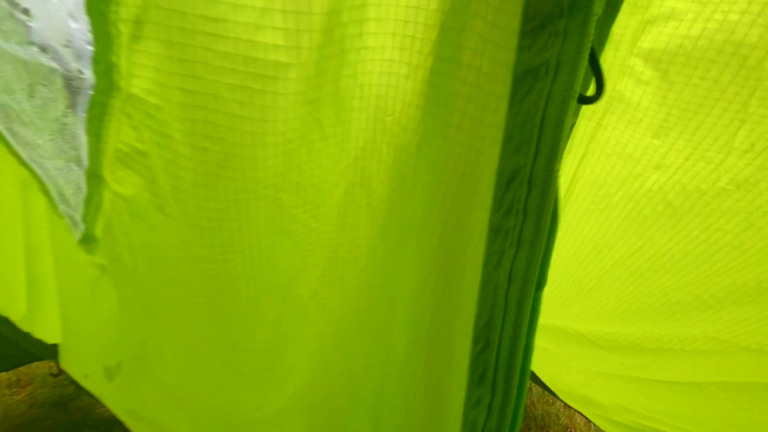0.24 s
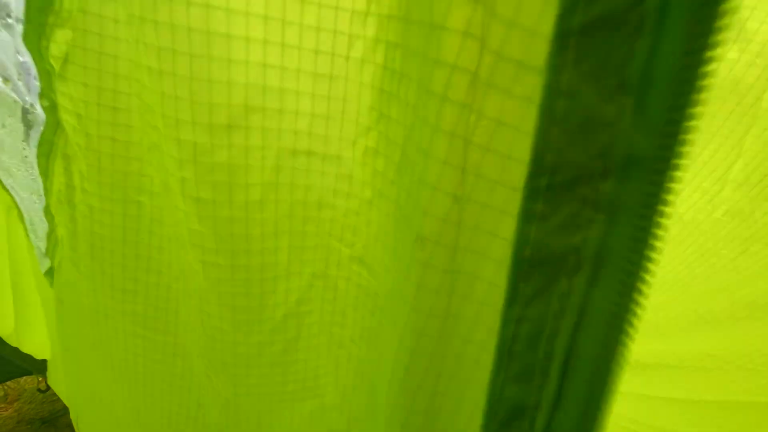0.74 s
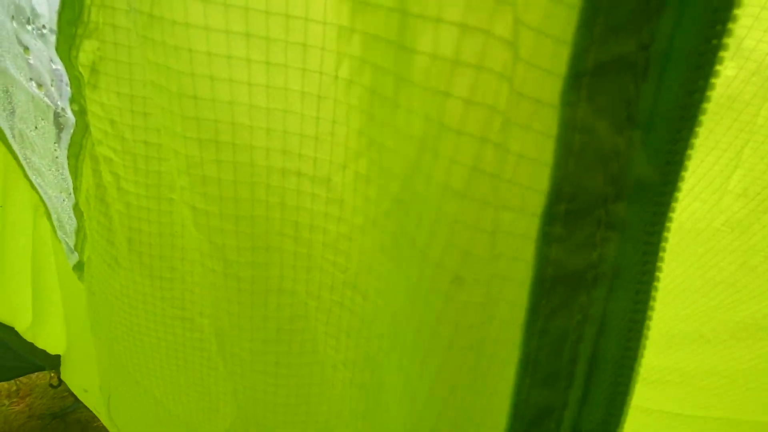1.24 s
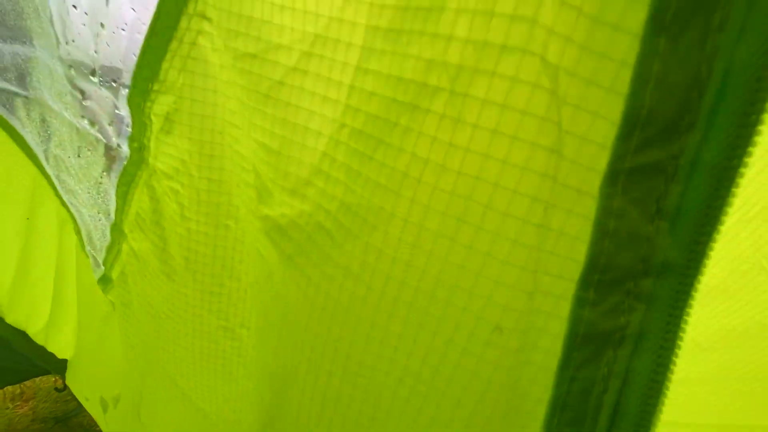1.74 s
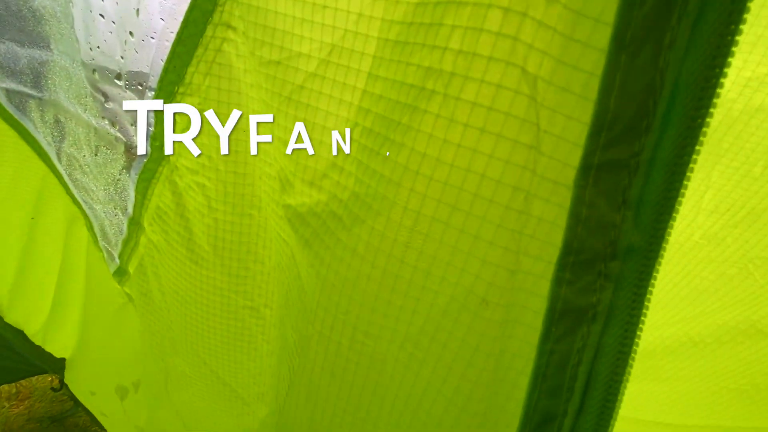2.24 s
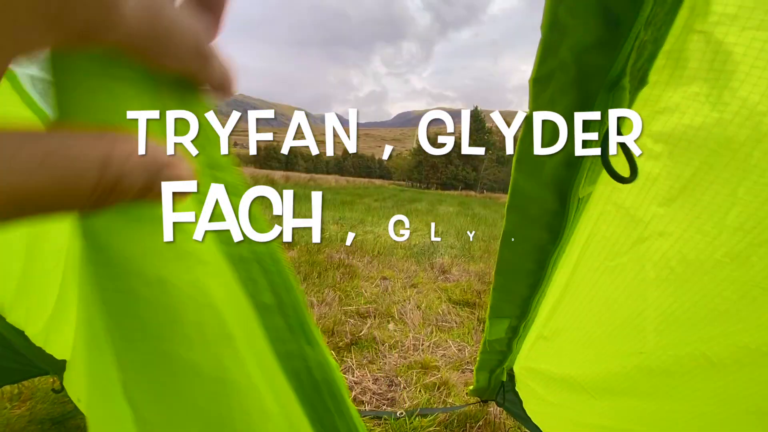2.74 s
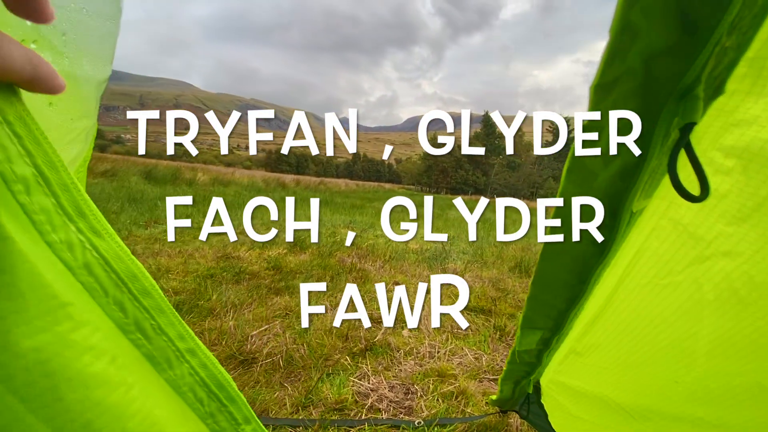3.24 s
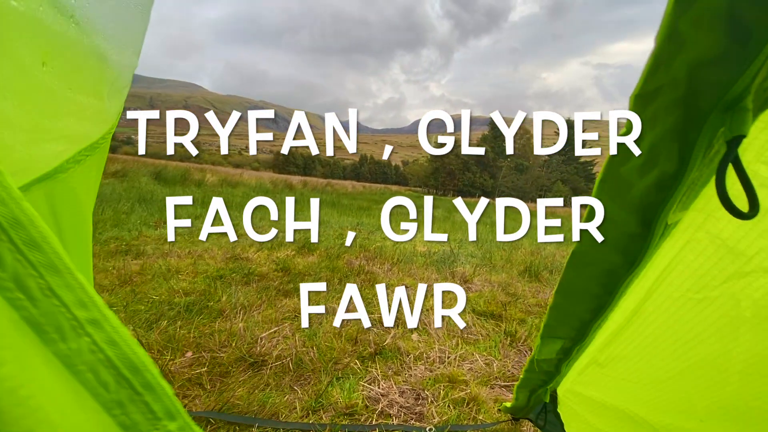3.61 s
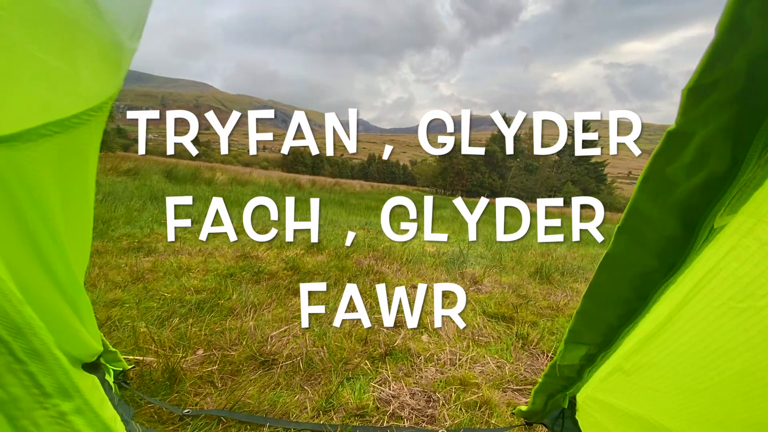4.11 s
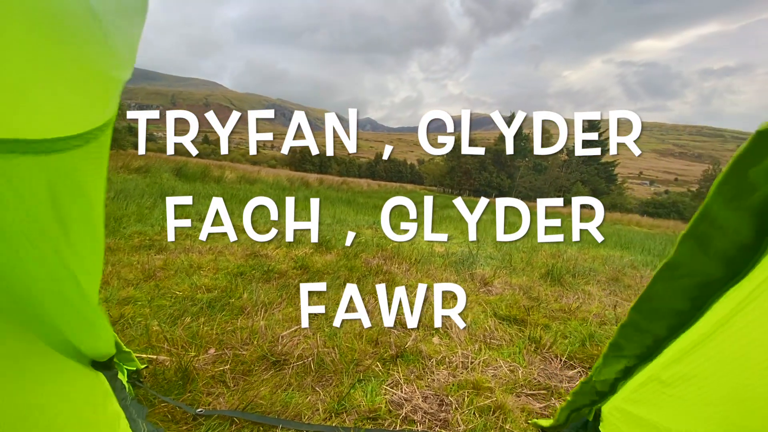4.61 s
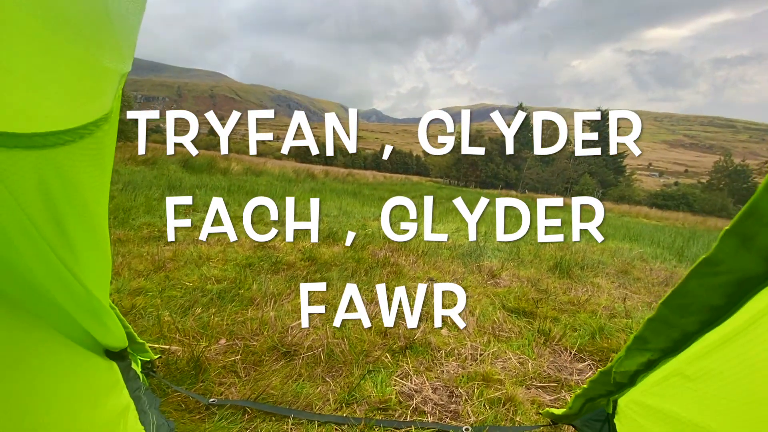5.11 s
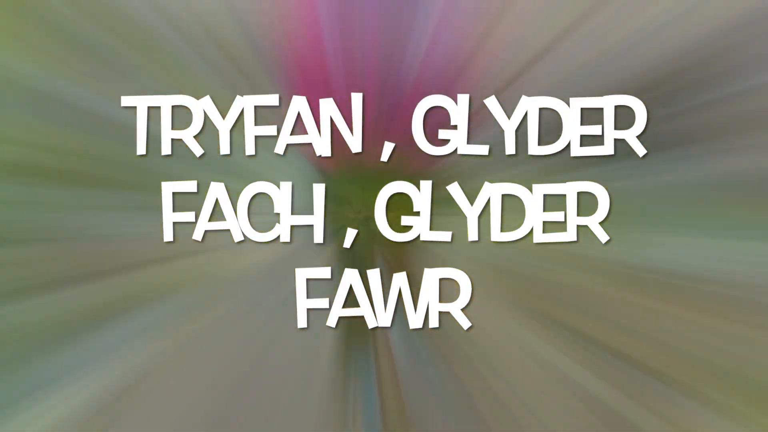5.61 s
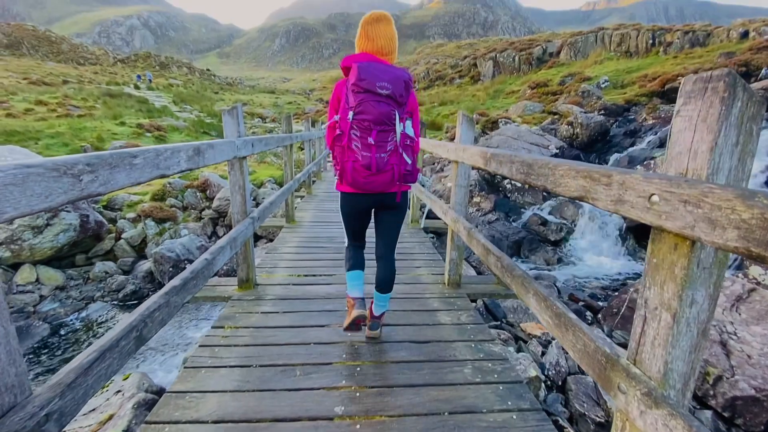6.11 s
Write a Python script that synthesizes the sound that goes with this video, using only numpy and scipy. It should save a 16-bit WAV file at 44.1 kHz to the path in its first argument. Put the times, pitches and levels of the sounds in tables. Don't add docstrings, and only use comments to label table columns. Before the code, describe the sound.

Close zip rasps and tooth ticks, a pause, sharp cracks of tent fabric and hook tape tearing free, then the roar of a mountain stream.

```python
import sys
import numpy as np
from scipy import signal
from scipy.io import wavfile
from scipy.ndimage import uniform_filter1d

SR = 44100
rng = np.random.default_rng(int(sys.argv[2]) if len(sys.argv) > 2 else 0)


def master(y):
    cut = np.clip(np.atleast_2d(y).T, -1, 1)
    pcm = np.round(cut * 32767)
    wavfile.write(sys.argv[1], SR, pcm.astype(np.int16))


def ratio_of_db(decibels):
    return 10 ** (np.asarray(decibels, float) / 20)


N = 280476


def rms_one(x):
    return x / np.sqrt(np.mean(x ** 2) + 1e-20)


def evened(x):
    return x / np.sqrt(uniform_filter1d(x ** 2, size=1300) + 1e-9)


def summed(*levels_db):
    return 10 * np.log10(sum(ratio_of_db(db) ** 2 for db in levels_db))


def in_time(rows, fade=0.0075):
    s, *columns = np.transpose(rows)
    t = np.arange(N) / SR
    gate = np.clip(np.minimum(t - s[0], s[-1] - t) / fade + 1, 0, 1)
    return [gate] + [np.interp(t, s, c) for c in columns]


def at_hz(points, hz):
    return np.interp(np.log(hz), np.log(np.array(points)[:, 0]), np.array(points)[:, 1])


def panned(x, pan_db):
    return x * ratio_of_db(np.array([pan_db / 2, -pan_db / 2]).reshape(2, -1))


def filtered(x, order, hz, kind):
    return signal.sosfilt(signal.butter(order, hz, kind, fs=SR, output="sos"), x)


def resonance(x, hz, width_hz):
    r = np.exp(-np.pi * width_hz / SR)
    poles = [1, -2 * r * np.cos(2 * np.pi * hz / SR), r * r]
    return signal.lfilter(np.array([1, 0, -1]) * (1 - r * r) / 2, poles, x)


def drift(rate, size):
    r = np.exp(-80 * np.pi * rate / SR)
    slow = signal.lfilter([1], [1, -2 * r, r * r], rng.standard_normal(size // 40 + 2002))[2000:]
    return np.interp(np.arange(size) / 40, np.arange(len(slow)), rms_one(slow))


EDGES = 30 * 2 ** np.arange(0, 9.3, 1 / 3)


def bands(spectrum, likeness, balance, strength, patchy_db):
    white = rng.standard_normal((2, 2, len(strength))) * (strength + 1e-9)
    centre = np.sqrt(EDGES[1:] * EDGES[:-1])
    level = ratio_of_db(at_hz(spectrum, centre)) * (centre > spectrum[0][0])
    level = level / np.sqrt(np.sum(level ** 2 * np.diff(EDGES)) * 2.51 / SR)
    shared = drift(1.9, len(strength))
    for k, hz in enumerate(centre):
        if level[k] > 0:
            mid, side = filtered(white[k % 2], 2, EDGES[k:k + 2], "band")
            alike = np.clip(at_hz(likeness, hz), -1, 1)
            pair = np.sqrt((1 + alike) / 2) * mid + np.sqrt((1 - alike) / 2) * side * [[1], [-1]]
            patches = ratio_of_db(patchy_db * (.4 * shared + drift(9.3, len(strength))))
            yield hz, panned(level[k] * patches * pair, at_hz(balance, hz))


def fabric_wave(settle_hz, sweep, decay_s):
    t = np.arange(1, int(.12 * SR)) / SR
    turns = settle_hz * t + sweep * np.log(1 + t / 0.00058)
    return np.sin(2 * np.pi * turns) * np.exp(-t / decay_s) * (1 - np.exp(-t / 0.0017))


def struck(times, levels_db, shape):
    clicks = np.zeros(N)
    np.add.at(clicks, np.minimum((np.array(times) * SR).astype(int), N - 1), ratio_of_db(levels_db))
    return signal.fftconvolve(clicks, shape)[:N]


def burst(rise_s, decay_s, tail_db, tail_s):
    t = np.arange(int(0.068 * SR)) / SR
    return (1 - np.exp(-(t / rise_s) ** 2)) * (np.exp(-t / decay_s) + ratio_of_db(tail_db) * np.exp(-t / tail_s))


# (time [s], tooth rate [1/s], effort [dB])
FAST_PULLS = [
    [(0, 85.5, -33), (.08, 95, -30.5), (.15, 128, -25), (.175, 235, -25), (.2, 270, -27.5), (.23, 210, -27),
     (.25, 190, -28.5), (.266, 77, -32)],
    [(.274, 148, -25), (.292, 247, -29), (.32, 127, -28), (.35, 195, -27), (.4, 102, -30), (.44, 110, -48)],
    [(.53, 84, -49), (.555, 105, -29), (.575, 192, -31.5), (.6, 258, -30), (.62, 248, -32),
     (.64, 243, -31.5), (.662, 230, -35), (.675, 110, -39), (.72, 42, -51)],
    [(1.39, 115, -43), (1.42, 262, -29), (1.445, 260, -30.5), (1.465, 327, -22.5), (1.478, 470, -30.5),
     (1.5, 324, -29.5), (1.52, 400, -28.5), (1.545, 206, -39), (1.57, 230, -64)],
]


def fast_pulls():
    strength, low, body, pulling = np.zeros((4, N))
    for rows in FAST_PULLS:
        gate, per_s, rasp_db = in_time(rows)
        thrum_db = rasp_db - 0.5
        body_db = -2.5 + np.log2(per_s / 200)
        turns = np.cumsum(per_s * (1 + .035 * drift(50, N))) / SR
        kicks = (np.diff(np.floor(turns), prepend=-1) > 0) * ratio_of_db(2.6 * rng.standard_normal(N))
        kick_wave = fabric_wave(settle_hz=113.0, sweep=0.632, decay_s=0.0037)
        thrum = evened(signal.fftconvolve(kicks, kick_wave)[:N])
        swing = np.sin(2 * np.pi * turns) + .25 * np.cos(4 * np.pi * turns)
        swing = swing * ratio_of_db(1.8 * drift(40, N))
        low += gate * ratio_of_db(thrum_db) * (ratio_of_db(-3) * thrum + ratio_of_db(1.9) * swing)
        rasp_burst = burst(rise_s=0.0003, decay_s=0.0007, tail_db=-1, tail_s=0.012)
        rattle = signal.fftconvolve(kicks, rasp_burst)[:N]
        strength += gate * ratio_of_db(rasp_db) * evened(rattle)
        clicks = filtered(kicks + 1e-18, 2, [350, 1700], "band")
        low += gate * ratio_of_db(rasp_db + body_db - 15) * evened(clicks)
        body += gate * body_db
        pulling += gate
    return strength, low, body, pulling


# (time [s], level [dB])
JOLTS = [
    (.551, -17),
    (.674, -20),
    (.692, -19),
    (.418, -25),
]
# (time [s], tick peak [dB], fabric wave [dB])
TEETH = [(0.4984, -21, -20), (0.5315, -19, -21), (0.853, -26.5, -28), (0.912, -25.5, -50),
         (0.956, -23.5, -43), (0.9904, -23.5, -38), (1.024, -22.5, -38), (1.043, -25, -45),
         (1.049, -20, -64), (1.0786, -28, -44), (1.1063, -23, -33), (1.137, -20, -45), (1.147, -21.5, -28),
         (1.1708, -17.5, -36), (1.18, -22, -16.5), (1.189, -17.5, -25), (1.198, -25, -33),
         (1.208, -17, -36), (1.221, -19, -18.5), (1.234, -15, -25), (1.244, -15.5, -24), (1.253, -19, -26),
         (1.2636, -28, -31), (1.2778, -17, -18), (1.285, -14.5, -32), (1.294, -17, -28), (1.3173, -18, -20),
         (1.334, -13.5, -33), (1.341, -20, -30), (1.3516, -35, -26), (1.376, -17.5, -36), (1.386, -20, -31),
         (1.396, -18, -34)]


def slow_teeth():
    s, tick_db, wave_db = np.transpose(TEETH)
    bright_db = -2.5 + .8 * rng.standard_normal(len(s)) + 0.21 * (tick_db - wave_db)
    bright_db = bright_db + 2.5 * (np.clip(s, .85, 1.3) - 1.25)
    tick = burst(rise_s=0.00052, decay_s=0.0011, tail_db=-15.0, tail_s=0.009)
    strength = struck(s, tick_db - 6.5, tick)
    low = struck(s, wave_db - 5, fabric_wave(settle_hz=60.0, sweep=0.698, decay_s=0.024))
    low += struck(*np.transpose(JOLTS), fabric_wave(settle_hz=56.0, sweep=0.3, decay_s=0.018))
    bright = np.interp(np.arange(N) / SR, s + 0.0044, bright_db)
    return strength, low, bright


def tooth_knocks():
    s, tick_db, _ = np.transpose(TEETH)
    clicks = struck(s + 0.00064, tick_db, np.ones(1))
    knock = ratio_of_db(17) * resonance(clicks, hz=870, width_hz=300)
    knock += ratio_of_db(-5.0) * resonance(clicks, hz=3000, width_hz=6000)
    flick = struck([1.0505], [-13], burst(rise_s=0.00033, decay_s=0.0011, tail_db=-27, tail_s=.005))
    flick = flick * rng.choice([-1, 1], N)
    return knock + filtered(flick + 1e-18, 3, [3700, 7200], "band")


# (time [s], length [s], pitch [Hz], width [Hz], level [dB])
BINDS = [(-.04, 0.14, 1430, 120, 19), (-.03, 0.061, 2440, 170, 22), (-.03, 0.11, 1750, 170, 16),
         (0.173, 0.084, 680, 150, 18.5), (.16, 0.081, 1210, 190, 10), (-0.36, 0.083, 2376, 277.8, 7),
         (1.424, 0.22, 1050, 140, 12), (1.415, 0.082, 1750, 200, 1), (1.39, 0.12, 2700, 200, 12),
         (.1, 0.043, 3200, 200, 0), (-0.0085, 0.08, 1700, 150, -2)]


def binding(shake):
    t = np.arange(N) / SR
    out = np.zeros(N)
    for s, length_s, hz, width_hz, db in BINDS:
        spell = np.sin(np.pi * np.clip((t - s) / length_s, 0, 1))
        out += ratio_of_db(db) * spell * resonance(shake, hz, width_hz)
    return out


# (pitch [Hz], width [Hz], level [dB])
SLIDER = [(815, 250, 15), (1650, 120, 3), (2600, 190, -3), (4100, 870, -4.5)]
# (frequency [Hz], density [dB per Hz])
RASP = [(290, 2.5), (500, -5.5), (3390, -14), (4090, -11.5), (6060, -21), (6800, -17.5), (11100, -22.5),
        (12500, -31), (13400, -29), (14200, -16), (16000, -34)]
# (frequency [Hz], left-right likeness [-1 to 1])
ZIP_LIKENESS = [(60, 0.71), (180, 0.22), (550, 0.6), (1650, 0.56), (4970, 0.0092), (15000, 0.092)]


def zip_fastener():
    fast_strength, fast_low, body, pulling = fast_pulls()
    slow_strength, slow_low, slow_bright = slow_teeth()
    strength = fast_strength + slow_strength
    bright = slow_bright * (1 - pulling) - 0.5 * pulling
    out = panned(fast_low + slow_low, -4.0)
    end = int(1.7 * SR)
    balance = [(500, 0.6), (12000, -1.8)]
    for hz, band in bands(RASP, ZIP_LIKENESS, balance, strength[:end], patchy_db=0.0):
        tilt_db = bright[:end] * np.log2(max(hz, 900) / 3000)
        out[:, :end] += band * ratio_of_db(tilt_db + body[:end] * (hz < 1250))
    shake = rng.standard_normal(N) * (strength + 1e-9)
    singing = binding(shake) + tooth_knocks()
    for hz, width_hz, db in SLIDER:
        level_db = db - 7.5 + .25 * body + 2.0 * drift(22, N)
        singing += ratio_of_db(level_db) * resonance(shake, hz, width_hz)
    out += panned(singing, -3.0)
    shade = np.clip((0.406 - np.arange(N) / SR) / 0.089, 0, 1)
    return out + shade * (filtered(out, 3, [5350, 6300], "bandstop") - out)


def crack(strain_s, decay_s, tail_db):
    t = np.arange(int(.03 * SR)) / SR - .004
    release = np.exp(-t / decay_s) + ratio_of_db(tail_db) * np.exp(-t / 0.0053)
    return np.where(t < 0, np.exp(t / strain_s), release)


def tear():
    stages = 4.348 + np.cumsum([0, 0.024, 0.02, 0.0088])
    gate, tear_db = in_time(np.transpose([stages, [-20.5, -22, -22, -37]]), fade=0.0066)
    hooks = (rng.random(N) < 450 / SR) * ratio_of_db(4.5 * np.minimum(rng.exponential(1, N), 3))
    hail = signal.fftconvolve(hooks, burst(rise_s=.0008, decay_s=.001, tail_db=-16, tail_s=.004))[:N]
    flap = rms_one(filtered(rng.standard_normal(N), 2, [45, 200], "band"))
    return gate * ratio_of_db(tear_db) * evened(hail), gate * ratio_of_db(tear_db + 0.5) * flap


# (time [s], crack peak [dB], fabric wave [dB], brightness [dB per octave], left-right [dB])
FOLDS = [(1.7534, -21, -10.5, -7.5, -3), (2.5009, -31, -24, -10.5, -24), (2.5234, -58, -61, 19.5, 6),
         (2.6443, -25, -51, -7.5, 11), (2.9865, -12.5, -35, -0.5, -2), (4.0087, -16, -52, 0.5, 3),
         (3.312, -15.5, -41, 5.5, 7), (2.3857, -34, -45, -8.5, 0.5), (2.7559, -24, -45, -1, 0.5),
         (3.047, -21, -45, 2, 2), (3.229, -24, -43, -3, .5), (3.279, -26, -45, -1, 2),
         (3.781, -24, -45, 2, .5), (4.664, -28, -45, -1, 0.5), (4.751, -24, -45, -3, 7),
         (4.859, -20.5, -40, -3.5, 5)]
# (time [s], crack peak [dB], fabric wave [dB], brightness [dB per octave], left-right [dB])
LONE_HOOKS = [(3.088, -1.5, -6, -1, 1.5), (3.2167, -16, -19.5, 0.5, 4), (3.3303, -9.5, -25.5, 0.5, -3),
              (3.4705, -2.5, -7.5, -1, -1), (3.4992, -14, -27, -4, 1), (3.506, -22, -36, 0, 5),
              (3.543, -16, -43, -3, 1), (3.551, -9.5, -28, -2.5, -2), (3.5788, -4.5, -16, -1.5, 0),
              (3.6529, -1, -22, -3, -1), (3.683, -6, -10, 0.5, 2), (3.71, -5, -6.5, -2, 0),
              (3.748, -6.5, -7, 0.5, 1), (3.8843, -8, -18.5, -2.5, 4.5), (3.894, -5, -15.5, -2.5, -8.5),
              (4.052, -1, -26, -4, 2.5), (4.056, -6, -47, 0, -6), (4.0774, -12.5, -39, -3.5, 1),
              (4.1097, -4, -9.5, -1, -1), (4.1195, 2.5, -5, -4, 0.5), (4.126, 1.5, -7.5, -2, 2),
              (4.151, -13, -36, -3, 6), (4.157, -12, -40, -1, -3), (4.162, -12.5, -40, -1.5, 1),
              (4.187, -31, -40, 3, 2), (4.1734, -2, -19, -3.5, -5), (4.2097, -8, -16, -4, -1),
              (4.231, -11, -40, -2, -1), (4.243, -4.5, -20, -3, 1), (4.2772, -4.5, -19, -3, 2),
              (4.282, -5, -23, -2.5, -9), (4.5642, -15, -29, -6, 16)]
# (time [s], crack peak [dB], fabric wave [dB])
TEAR_HOOKS = [(4.3254, 2.5, -16), (4.3305, 2.5, -15), (4.3368, 2, -9), (4.3415, 2.5, -20),
              (4.3497, -16, -19), (4.357, -13, -34), (4.3607, 1, -18), (4.364, -10, -24),
              (4.3687, 2.5, -25), (4.373, -9, -25), (4.382, 3.5, -27), (4.3865, -10, -24),
              (4.398, -16, -15), (4.4011, 10.5, -3)]
# (pitch [Hz], width [Hz], level [dB])
TAPE = [(2766, 286, 1), (2220, 300, -20), (3380, 94, -7), (3870, 190, -7), (4520, 145, -4), (8160, 550, -8),
        (10320, 400, -9)]
LONE_RING_DB = [-3, 8, -4.5, -2, -1, 0, -2.5]
# (frequency [Hz], density [dB per Hz])
CRACK = [(290, -3.5), (500, -1.5), (960, -2), (2100, -7.5), (2810, -5.5), (4600, 2), (7100, -2), (8090, 2),
         (10700, -10), (12300, 4), (13400, -1), (14900, 2), (16000, -22)]
# (frequency [Hz], left-right likeness [-1 to 1])
CLOTH_LIKENESS = [(60, 0.6), (150, 0.52), (380, 0.16), (950, -0.21), (2380, -0.27), (5980, 0.096),
                  (15000, -0.16)]
# (frequency [Hz], left-right [dB])
CLOTH_BALANCE = [(60, -4), (180, -2), (550, 1), (1650, 0.5), (4970, -0.5), (15000, -5.5)]


def snaps():
    chance = rng.standard_normal((len(TEAR_HOOKS), 2)) * [-0.4, -2.5] + [-1.5, -1.5]
    rows = np.vstack([FOLDS, LONE_HOOKS, np.hstack([TEAR_HOOKS, chance])])
    order = np.argsort(rows[:, 0])
    s, crack_db, wave_db, bright_db, pan_db = rows[order].T
    is_fold = order < len(FOLDS)
    outside_tear = order < len(FOLDS) + len(LONE_HOOKS)
    t = np.arange(N) / SR
    bright = np.interp(t, s + 0.00086, bright_db)
    pan = np.interp(t, s + 0.0058, pan_db - 2.0)

    tearing, flap = tear()
    strength = struck(s - .0028, crack_db - 11.5, crack(strain_s=0.001, decay_s=0.0006, tail_db=-12.5))
    strength += tearing
    out = np.zeros((2, N))
    for hz, band in bands(CRACK, CLOTH_LIKENESS, CLOTH_BALANCE, strength, patchy_db=1.0):
        out += ratio_of_db(1.0) * band * ratio_of_db(bright * np.log2(hz / 4000))

    shake = rng.standard_normal(N) * (strength + 1e-9)
    shake += struck(s + .0012, crack_db + 6.5, np.ones(1))
    uneven_db = 4 * rng.standard_normal((len(s), len(TAPE))) - 12 * is_fold[:, None]
    uneven_db = uneven_db + np.outer(outside_tear, LONE_RING_DB)
    rings = []
    for (hz, width_hz, db), own_db in zip(TAPE, uneven_db.T):
        ring_db = db + 12 + bright * np.log2(hz / 4000) + np.interp(t, s + 0.011, own_db)
        rings.append(ratio_of_db(ring_db) * resonance(shake, hz, width_hz))
    low_rings, high_rings = sum(rings[:5]), sum(rings[5:])
    out += np.array([np.roll(low_rings, shift=2) + ratio_of_db(2) * high_rings, low_rings + high_rings])

    wave = struck(s, wave_db - 9.5, fabric_wave(settle_hz=39.4, sweep=0.96, decay_s=0.01))
    thump_shape = fabric_wave(settle_hz=39.5, sweep=0.414, decay_s=0.014)
    thump = struck([4.404, 4.575, 2.655], [-3.0, -16.0, -22.0], thump_shape)
    knock = struck([1.767], [-30.0], fabric_wave(settle_hz=203, sweep=2.24, decay_s=0.0073))
    return panned(out, pan) + panned(wave + thump + knock + flap, -6.0)


def drag():
    gate, level_db = in_time([(4.462, -31.5), (4.57, -29.5)])
    rub = rng.standard_normal((2, N))
    singing = resonance(rub, hz=940, width_hz=280) + 0.5 * resonance(rub, hz=2710, width_hz=530)
    return gate * ratio_of_db(level_db) * rms_one(singing)


# (time [s], level [dB])
HANDLING = [(.44, -44.5), (.53, -41.5), (.72, -58), (1.12, -48.5), (1.29, -43.5), (1.5, -54.5), (2.0, -57),
            (2.335, -61.5), (2.37, -50.5), (3.05, -44.5), (3.98, -44.5), (4.3, -30.5), (4.42, -36.5),
            (4.575, -31.5), (4.6, -45), (4.78, -43.5), (4.95, -47), (5.2, -53.5), (5.3, -42)]
# (time [s], rise [s], fall [s], peak [dB])
STROKES = [
    (2.358, 0.05, 0.085, -36.5),
    (2.53, 0.28, 0.19, -35.5),
    (4.45, 0.11, 0.01, -29.5),
]
# (time [s], level [dB])
WIND = [(0, -23), (.12, -27.5), (.3, -27), (.44, -39), (.56, -26), (.72, -48.5), (.93, -32.5),
        (1.15, -33.5), (1.39, -28.5), (1.57, -44), (2.0, -50), (2.335, -48), (2.42, -44), (3.05, -49.5),
        (3.98, -48), (4.3, -34), (4.42, -24), (4.465, -24.5), (4.56, -46), (4.6, -47), (5.3, -52.5)]
HANDLED_DB = [-5, -5.5, -9]
STROKED_DB = [-14.5, -8, -4]


def cloth_levels():
    wind_db, handling_db = in_time(WIND)[1], in_time(HANDLING)[1]
    stroke = 1e-6
    for s, rise_s, fall_s, db in STROKES:
        edge_db = db - 8
        rows = [(s, edge_db), (s + rise_s, db), (s + rise_s + fall_s, edge_db)]
        gate, level_db = in_time(rows)
        stroke = stroke + gate * ratio_of_db(level_db)
    stroke_db = 20 * np.log10(stroke)
    body_db, rub_db, sheen_db = [summed(handling_db + handled, stroke_db + stroked)
                                 for handled, stroked in zip(HANDLED_DB, STROKED_DB)]
    still_body_db = -50.5
    return [wind_db, summed(body_db, still_body_db), rub_db, sheen_db]


# (frequency [Hz], density [dB per Hz])
RUB = [(18, -36), (30, -12.5), (64, 3.5), (295, -4), (355, -7.5), (426, -9.5), (2010, -17.5), (3310, -18),
       (6050, -31.5), (11400, -33.5), (13300, -45.5), (14800, -9), (16000, -28)]


def cloth_and_wind():
    gate = in_time([(0, 0), (HANDLING[-1][0], 0)], fade=0.79)[0]
    grains = ratio_of_db(1.6 * np.minimum(rng.exponential(1, N // 60 + 1), 4)).repeat(60)[:N]
    rubbing = bands(RUB, CLOTH_LIKENESS, CLOTH_BALANCE, rms_one(grains), patchy_db=2.0)
    centres, layers = zip(*rubbing)
    region = np.searchsorted([150, 1500, 6000], centres)
    power = np.bincount(region, [np.var(band.mean(axis=0)) for band in layers])
    lift_db = np.array(cloth_levels()) - 10 * np.log10(power)[:, None]
    place = np.interp(np.log(centres), np.log([90, 500, 3000, 9000]), np.arange(4))
    shares = np.clip(1 - np.abs(place[:, None] - np.arange(4)), 0, 1)
    return gate * sum(ratio_of_db(share @ lift_db) * band for share, band in zip(shares, layers))


# (frequency [Hz], density [dB per Hz])
WATER = [(18, -50), (30, -42), (93, -6.5), (259, -3.5), (569, -10), (866, -3.5), (1280, -10.5), (4000, -20),
         (11400, -26.5), (13700, -30), (16000, -38)]
# (frequency [Hz], left-right likeness [-1 to 1])
WATER_LIKENESS = [(60, 1), (150, 0.97), (380, 0.62), (950, -0.68), (2380, -0.0019), (5980, 0.16),
                  (15000, -0.099)]
# (frequency [Hz], left-right [dB])
WATER_BALANCE = [(60, -4), (240, 0.5), (950, -2.5), (3770, 4), (15000, -2)]


def stream():
    start = int(5.1 * SR)
    size = N - start
    splashes = ratio_of_db(1.0 * np.minimum(rng.exponential(1, size // 40 + 1), 4)).repeat(40)[:size]
    water = bands(WATER, WATER_LIKENESS, WATER_BALANCE, rms_one(splashes), patchy_db=-0.5)
    roar = sum(band for hz, band in water)
    born = (rng.random((2, size)) < 250 / SR) * ratio_of_db(3.9 * np.minimum(rng.exponential(1, (2, size)), 4))
    dealt = rng.integers(0, 16, size)
    gulps = np.zeros((2, size))
    for k, hz in enumerate(np.geomspace(150, 2200, 16)):
        r, w = ratio_of_db(-60 * hz / (12.0 * SR)), 2 * np.pi * hz / SR
        poles = [1, -2 * r * np.cos(w), r * r]
        gulps += signal.lfilter([0, np.sin(w)], poles, born * (dealt == k) + 1e-18)
    rise = np.clip(np.arange(N) / SR - 5.166, 0, 1)
    out = np.zeros((2, N))
    out[:, start:] = rms_one(roar) + ratio_of_db(-16.5) * rms_one(gulps)
    return np.sin(np.pi / 2 * rise) ** 2 * ratio_of_db(-16.5) * out


def bird(notes, waver, pan_db, lag, arch, peak_at, edge_db):
    song = np.zeros(N)
    for s, length_s, first_hz, last_hz, db in notes:
        x = np.arange(0, length_s, 1 / SR) / length_s
        flutter, wobble = drift(55, 8000)[:len(x)], drift(151, 8000)[:len(x)]
        glide = first_hz + (last_hz - first_hz) * x
        hz = glide * (1 + arch * np.sin(np.pi * x) + waver * wobble)
        level_db = db + np.interp(x, [0, peak_at, 1], [edge_db, 0, edge_db]) + 1.7 * flutter
        ends = np.clip(np.minimum(x, 1 - x) * length_s / 0.0016, 0, 1)
        note = ends * ratio_of_db(level_db) * np.sin(2 * np.pi * np.cumsum(hz) / SR)
        song[int(s * SR):][:len(x)] += note
    song += ratio_of_db(-15) * np.roll(song, 530) + ratio_of_db(-22) * np.roll(song, 1270)
    return panned(np.array([np.roll(song, lag), song]), pan_db)


# (time [s], length [s], first pitch [Hz], last pitch [Hz], peak [dB])
CHIRPS = [(.418, .016, 3600, 3300, -35), (.437, .018, 3620, 3730, -37), (1.608, 0.031, 4090, 3850, -43),
          (1.643, 0.044, 3850, 3540, -44), (1.67, 0.081, 3600, 3400, -50), (1.768, 0.031, 3820, 3320, -49),
          (2.073, 0.042, 3650, 3330, -66), (2.205, 0.044, 4050, 3600, -59), (3.103, 0.008, 3870, 3300, -43),
          (3.128, 0.011, 3770, 3400, -43), (3.139, .017, 3500, 3080, -39)]
WHISTLE = [
    (3.044, .035, 3900, 3930, -30.5),
]
WARBLE = [(4.964, 0.024, 3850, 4040, -39.5), (4.987, 0.027, 3740, 3880, -37),
          (5.002, 0.02, 4150, 4060, -35), (5.029, 0.0084, 3520, 4100, -37), (5.037, 0.013, 3770, 4150, -32),
          (5.074, 0.022, 3550, 3200, -38), (5.124, 0.015, 3850, 3670, -44), (5.139, 0.017, 3750, 3530, -37),
          (5.153, 0.018, 3500, 3950, -33), (5.177, 0.024, 4200, 4390, -36), (5.221, 0.016, 3900, 3630, -31),
          (5.276, 0.016, 4270, 3240, -37), (5.29, 0.0073, 3300, 3700, -43), (5.347, .012, 4200, 3720, -38),
          (5.357, .016, 3500, 3380, -40), (5.424, 0.022, 3900, 3750, -37.5)]
ARCHES = [
    (1.85, 0.044, 3360, 3350, -54),
    (3.908, 0.086, 3770, 3530, -41),
    (3.986, 0.035, 3730, 3550, -38),
]
LOW_BIRD = [
    (1.65, 0.044, 3220, 2780, -65),
    (1.7, .026, 2600, 2430, -71),
    (1.745, 0.05, 2700, 3080, -60),
    (1.785, 0.019, 3080, 2620, -60),
    (1.838, 0.051, 2920, 3100, -67),
    (1.888, 0.041, 3000, 2520, -66),
    (1.93, .022, 2400, 2300, -72),
]
FAR_NOTES = [
    (.73, 0.066, 2950, 2955, -59),
    (.98, 0.071, 3000, 2810, -58),
]
HIGH_BIRD = [
    (2.185, 0.12, 7930, 8030, -51),
    (2.315, 0.026, 7200, 7260, -47.5),
    (2.44, 0.069, 8300, 7650, -52),
]


def birds():
    out = bird(CHIRPS, waver=0.007, pan_db=-3.0, lag=1, arch=-0.011, peak_at=0.27, edge_db=-10.5)
    out += bird(WHISTLE, waver=0.0038, pan_db=-8.0, lag=0, arch=-0.018, peak_at=0.62, edge_db=-6)
    out += bird(WARBLE, waver=0.013, pan_db=-4.0, lag=1, arch=0.001, peak_at=0.41, edge_db=-9.5)
    out += bird(ARCHES, waver=0.0028, pan_db=-5.0, lag=1, arch=0.036, peak_at=0.49, edge_db=-5)
    out += bird(LOW_BIRD, waver=0.0071, pan_db=-29.0, lag=1, arch=0.019, peak_at=0.49, edge_db=-5)
    out += bird(FAR_NOTES, waver=0.021, pan_db=-15.0, lag=1, arch=0.025, peak_at=.45, edge_db=-5)
    out += bird(HIGH_BIRD, waver=0.032, pan_db=-14.0, lag=0, arch=0.019, peak_at=1.0, edge_db=-7.5)
    return out


def scene():
    return zip_fastener() + snaps() + drag() + cloth_and_wind() + stream() + birds()


def band_limit(x):
    return signal.sosfilt(signal.butter(12, 16340, fs=SR, output="sos"), x)


def record(dry):
    cut = filtered(dry, 2, 35, "high")
    cut = cut + 1.64 * resonance(cut, hz=48.4, width_hz=15.9)
    cut = cut - .4 * resonance(cut, hz=5700, width_hz=800) - .7 * resonance(cut, hz=7650, width_hz=250)
    cut = np.clip(cut, -1.1, 1.1)
    gap = signal.butter(3, [12400, 14500], "band", fs=SR, output="sos")
    cut = cut - 0.8 * signal.sosfiltfilt(gap, cut)
    cut = filtered(cut, 10, 15800, "low")
    return band_limit(np.clip(cut, -1, 1))


dry = scene()
out = record(dry)
master(out)
```